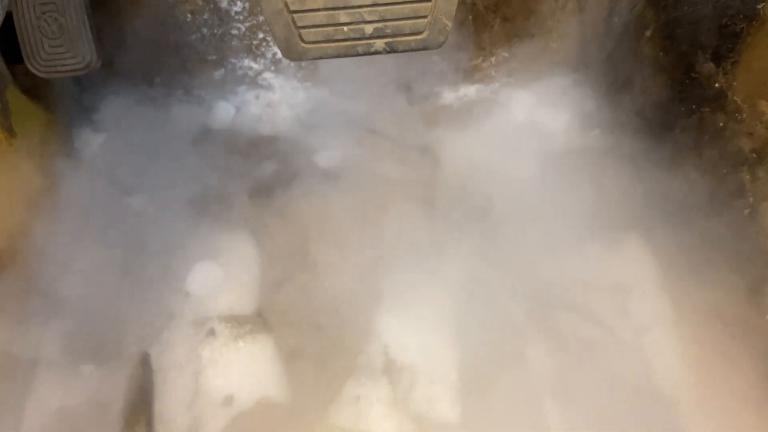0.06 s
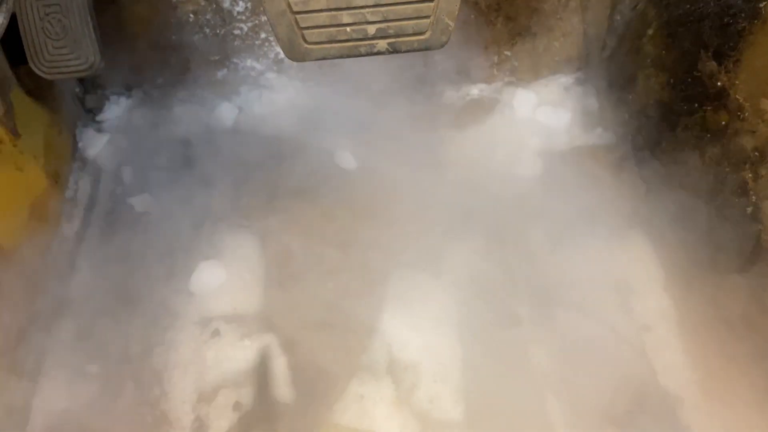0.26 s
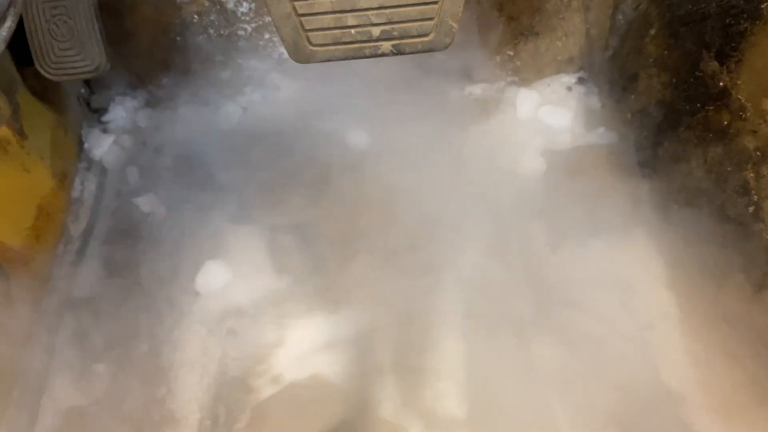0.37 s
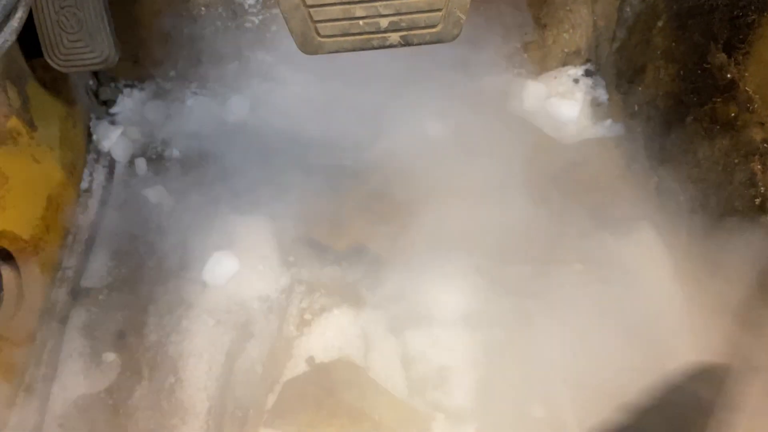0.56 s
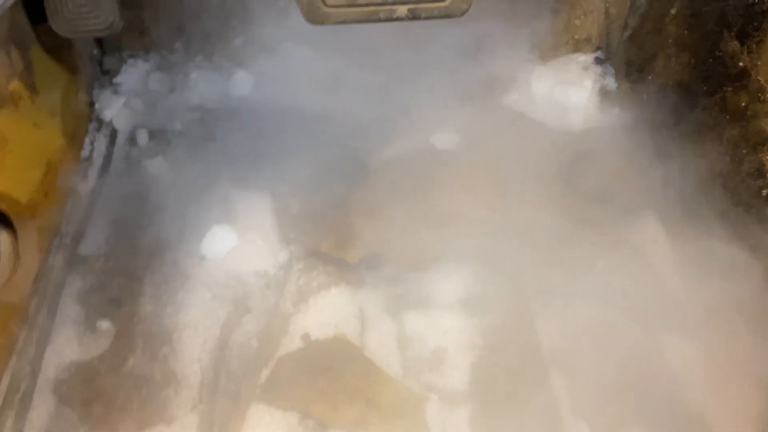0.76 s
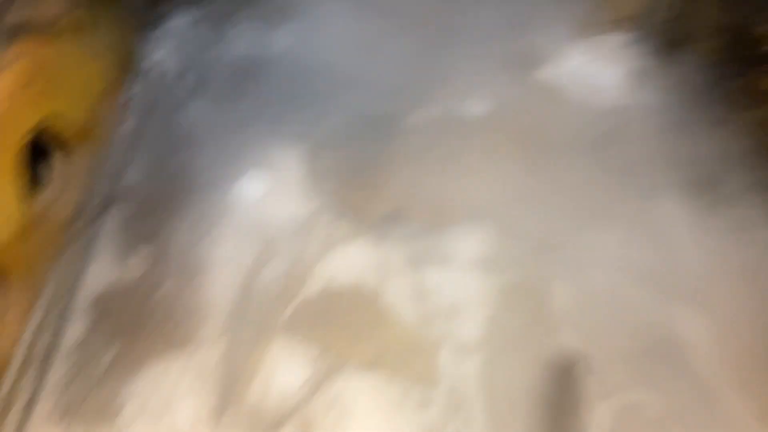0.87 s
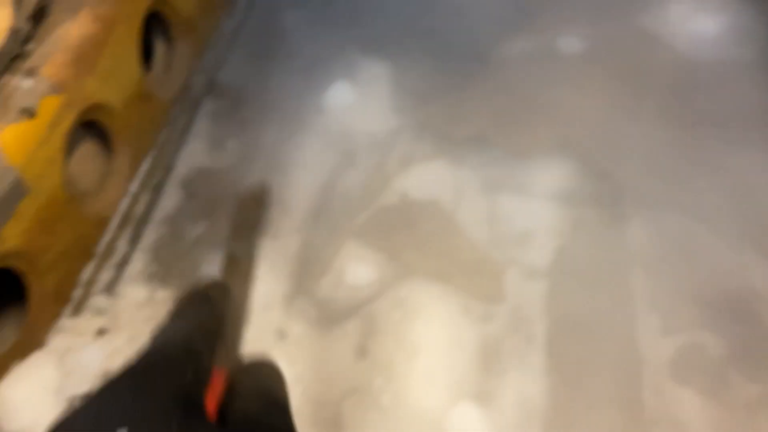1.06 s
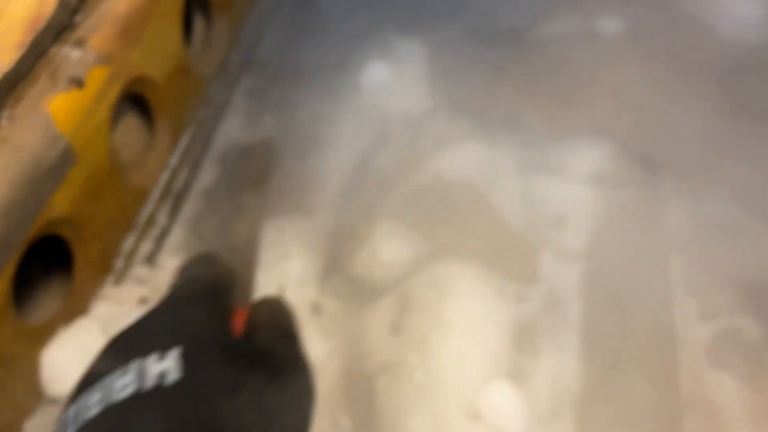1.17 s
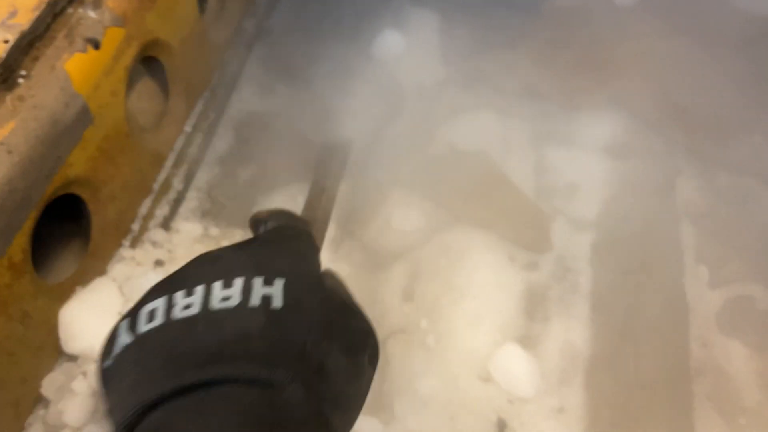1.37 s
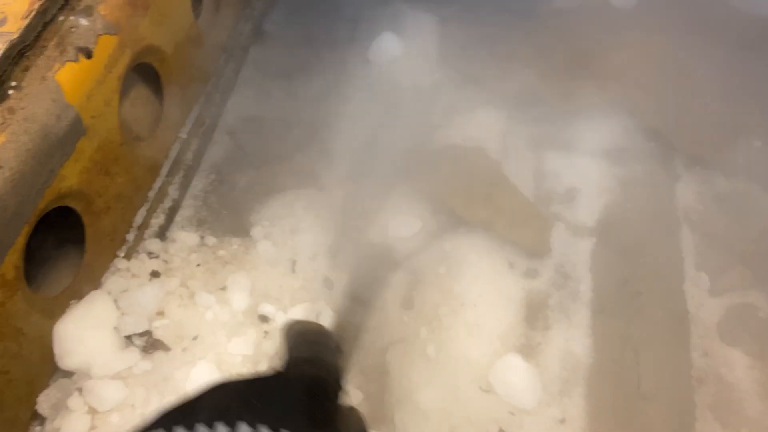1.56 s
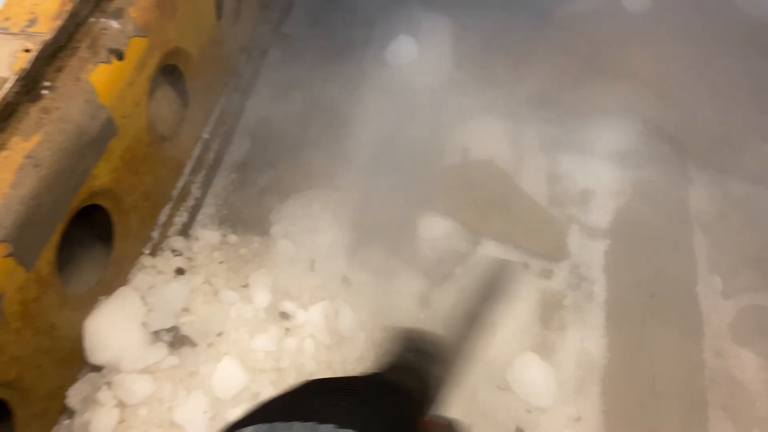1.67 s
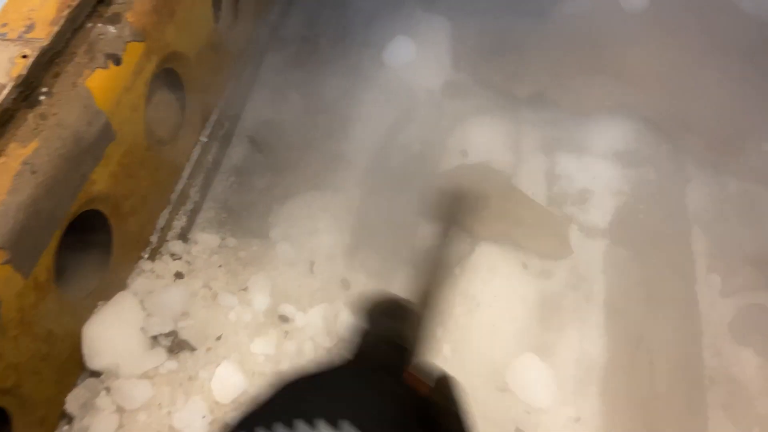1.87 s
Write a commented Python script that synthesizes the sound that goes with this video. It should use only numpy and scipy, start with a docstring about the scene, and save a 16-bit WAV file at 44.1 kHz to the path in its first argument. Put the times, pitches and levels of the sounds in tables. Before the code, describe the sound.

A cold chisel cracks and scrapes frozen, brittle material off a steel car floor, in two bursts

```python
"""Garage, close to a steel car floor: a cold chisel scrapes and cracks frozen sound deadener off it.
First a soft crack and a bouncing chip, then a volley of cracks and booms that runs into a gritty scrape.
A lull of small ticks and a faint rustle follows; a second volley breaks out and dies away.
Cracks are bursts of splinters, booms damped sines of the floor panel, the scrape clumped grit over rumble.
A camera close by hears it in widened stereo, with garage echoes and low steady air around it."""
import sys
import numpy as np
from scipy import signal
from scipy.fft import rfft, irfft, next_fast_len
from scipy.io import wavfile
from scipy.ndimage import uniform_filter1d

SR = 44100
rng = np.random.default_rng(int(sys.argv[2]) if len(sys.argv) > 2 else 0)


def nominal_scale(level):
    """Amplitude ratio for a level in decibels (scalar or array-like)."""
    x = np.asarray(level, float) / 20
    return 10 ** x


def generate_wav(signal):
    """Clip the signal to [-1, 1] and save it as 16-bit WAV at the path in sys.argv[1]."""
    frames = np.transpose(np.atleast_2d(signal))
    scaled = np.clip(frames, -1, 1) * 32767
    pcm = np.round(scaled).astype(np.int16)
    wavfile.write(sys.argv[1], SR, pcm)


N = 83790  # length in samples


def evened(x):
    """Scales a sound to an rms of one."""
    return x / np.sqrt(np.mean(x ** 2) + 1e-20)


def read(points, hz):
    """Reads a curve at the given frequencies, straight between its points on a log axis."""
    f, value = np.transpose(points)
    return np.interp(np.log(hz + 1), np.log(f + 1), value)


def add(mix, s, sound):
    """Lays a sound into the mix from second s, cut off at the end."""
    part = mix[max(round(s * SR), 0):][:len(sound)]
    part += sound[:len(part)]


def colour(x, points, tilt_db=0.):
    """Filters x by a spectrum, tilted about 3 kHz by tilt_db per octave."""
    hz = np.fft.rfftfreq(x.shape[-1], 1 / SR)
    tilt = tilt_db * np.log2((hz + 100) / 3000)
    return irfft(rfft(x) * nominal_scale(read(points, hz) + tilt), x.shape[-1])


def ring(modes, length_s):
    """The sum of dying sines that a struck thing gives."""
    t = np.arange(0, length_s, 1 / SR)
    return sum(nominal_scale(db - 60 * t / t60) * np.sin(2 * np.pi * hz * t) for hz, db, t60 in modes)


def grit(count, per_s, spread_db):
    """Sparse clicks of uneven size and sign."""
    chance, size, sign = rng.random((3, count))
    clicks = chance < per_s / SR
    return clicks * nominal_scale(-spread_db * np.log(size + .01)) * np.sign(sign - .5)


# How far left and right differ. Each row: frequency in Hz, level of the differing part in dB.
LEFT_RIGHT_DIFFERENCE = [(100, -31.5), (300, 1), (700, 5), (3000, 5), (5500, -3.2), (7500, -36.5)]


def pair(shared, other):
    """Two channels that hold one sound plus or minus a part that differs."""
    return shared + np.array([[1], [-1]]) * colour(other, LEFT_RIGHT_DIFFERENCE)


# Cracks of the frozen sheet, close by, and a faint low rustle near 1.2 s. Each row: start in seconds,
# level in dB, burst length in seconds, brightness in dB per octave, note of the burst in Hz.
CRACKS_AND_RUSTLE = [(0.01, -25, 0.0044, -4.5, 1450), (0.2128, -8.5, 0.0063, 2.5, 2580),
                     (.2140, -15.5, 0.0043, -2.5, 4500), (.2150, -9, 0.0032, 1., 3250),
                     (0.2581, -11.5, .004, -0.5, 1520), (.272, -17.5, 0.039, -2.5, 1500),
                     (.455, -10, 0.01, -10.5, 506), (0.383, -18, 0.0067, 2.5, 7200),
                     (0.3953, -5, 0.0024, -5.5, 1110), (.402, -9.5, 0.02, -8, 352),
                     (0.403, -10.5, 0.0093, -7.5, 1500), (0.451, -9, 0.0067, -3, 683),
                     (0.535, -20, 0.009, 1.4, 1280), (0.565, -23, 0.0084, -3.5, 1160),
                     (0.707, -29, 0.0047, -4, 1120), (1.193, -53, .02, -6.5, 800),
                     (1.216, -46, .015, -7, 767), (1.238, -49, .03, -7, 700),
                     (1.249, -41, 0.0054, -5.5, 815), (1.527, -19.5, 0.0055, 0, 1030),
                     (1.527, -19, 0.011, 0.5, 1886), (1.542, -12.5, 0.0018, 5, 4530),
                     (1.5441, -5.5, 0.0024, -0.4, 1927), (1.580, -23, 0.0039, 3.5, 2600),
                     (1.597, -17, .006, 1.3, 2600), (1.614, -13.5, 0.00542, 2.5, 7550),
                     (1.6252, -10.5, .002, 4.5, 2030), (1.631, -13, 0.0022, 1., 4570),
                     (1.644, -16.5, .003, 1.2, 2440)]
# Spectrum of the splinters. Each row: frequency in Hz, relative level in dB per Hz.
SPLINTER_SPECTRUM = [(180, -31), (400, -3), (900, -4.5), (2000, -1.55), (4000, -9), (6000, -12),
                     (9000, -12), (12000, -23.5), (15500, -25), (16500, -42.5)]


def cracks():
    """A first snap, a burst of splinters coloured by a note, a short fall; the rustle is made alike."""
    snap_db, fall_s = 12.5, .002
    note_db, note_octaves = 10, 0.32  # height of the note's peak, width to each side
    out, t = np.zeros(N), np.arange(4096) / SR
    for s, db, length, tilt_db, hz in CRACKS_AND_RUSTLE:
        shape = np.minimum(t / .0004, 1) * np.exp(-np.maximum(t - length, 0) / fall_s)
        note = [(hz / 2 ** note_octaves, 0), (hz, note_db), (hz * 2 ** note_octaves, 0)]
        splinters = evened(grit(4096, 12000, 3.))
        snap = nominal_scale(snap_db) * (np.arange(4096) == 24)
        burst = colour(splinters + snap, SPLINTER_SPECTRUM, tilt_db)
        # evened sets the rms, so 10.5 dB is left for the peaks
        add(out, s, nominal_scale(db - 10.5) * shape * evened(colour(burst, note)))
    return out


# The floor panel booming under a push. Each row: start in seconds, level in dB, pitch in Hz,
# length in seconds before it falls.
PANEL_BOOMS = [(0.2192, -10.5, 187, 0.0063), (.243, -25.5, 117, 0.0086), (0.2617, -11, 197, 0.0068),
               (0.277, -19.5, 121, 0.011), (0.319, -18.5, 140, 0.0084), (0.346, -23, 153, 0.013),
               (.379, -22.5, 162, 0.014), (0.399, -10, 207.8, 0.015), (0.453, -15.5, 250, 0.0053),
               (1.285, -37.5, 156, 0.018), (1.53, -26, 176, 0.018), (1.554, -18, 143, 0.0096),
               (1.572, -27, 80.5, 0.02), (1.6025, -16, 168, 0.0092), (1.627, -16, 199, 0.006),
               (1.648, -26, 156, 0.0079)]


def booms():
    """A few damped cycles of the panel, with a weak overtone."""
    rise_s, tail_s, overtone_db = .002, .005, -16
    out, t = np.zeros(N), np.arange(4096) / SR
    for s, db, hz, length in PANEL_BOOMS:
        shape = np.minimum(t / rise_s, 1) * np.exp(-np.maximum(t - length, 0) / tail_s)
        turn = 2 * np.pi * hz * t
        add(out, s, nominal_scale(db) * shape * (np.sin(turn) + nominal_scale(overtone_db) * np.sin(1.7 * turn)))
    return out


# Pressure of the blade sliding over grit. Each row: time in seconds, grit level in dB,
# panel rumble level in dB, brightness in dB per octave.
BLADE_PRESSURE = [(0, -38.5, -37, 0.3), (.05, -46.5, -40, -1.1), (.12, -55, -48.5, 0),
                  (0.196, -57.5, -53, -2.5), (.21, -44, -47.5, -5.5), (.225, -52, -36.5, -9),
                  (.25, -37, -27.5, -2), (0.271, -30, -28, 0), (.305, -24.5, -35.5, -1.5),
                  (0.336, -26, -29, 3), (0.369, -22.5, -35, 1.5), (0.391, -19, -26.5, 2),
                  (.42, -38, -27, 3), (.445, -35, -32.5, 7), (0.479, -33, -35, 0.5),
                  (.525, -37.5, -35.5, -2), (.56, -35.5, -37.5, -1.5), (0.623, -37.5, -32, 1),
                  (.70, -46, -42, 0), (.77, -62, -47, 0.9), (0.901, -81.5, -53, -12.2),
                  (1.108, -86, -60, 1.5), (1.135, -69.5, -63.5, 9), (1.17, -85, -63.5, 8),
                  (1.209, -66, -63, 1), (1.255, -70.5, -51, -1), (1.30, -86, -64, 2.5),
                  (1.399, -78.5, -69.5, 6), (1.45, -92, -71.5, 8.5), (1.527, -93.5, -68, 0),
                  (1.533, -28, -31.5, 0.2), (1.57, -42.5, -36, 3.9), (1.612, -29, -31.5, -0.7),
                  (1.638, -36.5, -24, -3.2), (1.688, -51, -39.5, 1.3), (1.802, -63, -62, .1),
                  (1.9, -71.5, -57.5, 1.5)]
# Spectrum of the grit. Each row: frequency in Hz, relative level in dB per Hz.
GRIT_SPECTRUM = [(240, -34), (450, -2.5), (1000, 1), (1500, -0.9), (2000, -2.5), (3200, -5.5), (4500, -8.5),
                 (6500, -10.5), (9000, -15), (12000, -15.5), (15600, -19.5), (16200, -58)]
# Spectrum of the panel rumble. Each row: frequency in Hz, relative level in dB per Hz.
RUMBLE_SPECTRUM = [(30, -23), (65, -4.5), (95, -2), (150, 0.65), (200, -4), (270, -5.5), (335, -2),
                   (420, -10.5), (650, -18.5), (950, -25.5), (1600, -59.5)]


def scrape():
    """Grit crushed in clumps under the blade, and the rumble of the panel beneath it."""
    clump_db, fragment_db = 1.7, 1  # loudness swing of the clumps; fragments over plain grit
    s, grit_db, rumble_db, tilt_db = np.transpose(BLADE_PRESSURE)
    clumps = evened(uniform_filter1d(uniform_filter1d(rng.standard_normal(N), 200), 200))
    dust = evened(grit(N, per_s=4000, spread_db=2.5)) + nominal_scale(fragment_db) * fragments(count=28)
    crushed = evened(colour(dust * nominal_scale(clump_db * clumps), GRIT_SPECTRUM))
    # the brightness moves with the blade
    hz, t, z = signal.stft(crushed, SR, nperseg=256)
    z = z * nominal_scale(np.interp(t, s, tilt_db) * np.log2((hz[:, None] + 100) / 3000))
    crunch = signal.istft(z, SR, nperseg=256)[1][:, :N]
    rumble = evened(colour(grit(N, per_s=900, spread_db=2.5), RUMBLE_SPECTRUM))
    t = np.arange(N) / SR
    return nominal_scale(np.interp(t, s, grit_db)) * crunch + nominal_scale(np.interp(t, s, rumble_db)) * rumble


def fragments(count):
    """Grains that ring a few cycles on their own note, each size lying a little to one side."""
    cycles = 8.
    out = np.zeros((2, N))
    for hz in np.geomspace(500, 9000, count) * rng.uniform(0.875, 1.07, count):
        turns = np.arange(round(3 * cycles * SR / hz)) * hz / SR
        note = np.sin(2 * np.pi * turns) * np.exp(-2 * turns / cycles) * hz / 1000
        sound = signal.oaconvolve(grit(N, 60, 3.0), note)[:N]
        out += sound * np.array([[1], [rng.normal(0, .6)]])  # shared part, differing part
    return evened(pair(*out))


# A loose chip bouncing to rest. Each row: start in seconds, level in dB.
CHIP_BOUNCES = [(0.029, -20), (0.092, -30), (0.126, -39.5), (0.147, -29.5)]
# Modes of the chip. Each row: frequency in Hz, relative level in dB, t60 in seconds.
CHIP_MODES = [(1150, -2, .03), (1540, 0, .028), (1350, -2, .02), (830, -7, .025), (2750, -17, .015)]
# Small splinters ticking. Each row: start in seconds, level in dB, pitch in Hz.
SPLINTER_TICKS = [(0.7581, -33, 15160), (0.8299, -46.5, 6470), (0.8654, -55.5, 2900), (0.9706, -51.5, 3230),
                  (1.0783, -54, 4070), (1.2794, -67, 2870), (1.3114, -79, 2840), (1.3414, -60.5, 7610),
                  (1.3787, -49, 6890)]


def chips():
    """Bounces ring the chip's modes; ticks are short puffs of noise around a pitch."""
    rise_s, tick_s, tick_octaves = .0006, 0.0023, 1.2
    out, t = np.zeros(N), np.arange(1024) / SR
    hz = np.fft.rfftfreq(1024, 1 / SR)
    for s, db in CHIP_BOUNCES:
        add(out, s, nominal_scale(db) * np.minimum(t / rise_s, 1) * ring(CHIP_MODES, 1024 / SR)[:1024])
    for s, db, pitch_hz in SPLINTER_TICKS:
        band = np.exp(-.5 * (np.log2((hz + 1) / pitch_hz) / tick_octaves) ** 2)
        puff = evened(irfft(rfft(rng.standard_normal(1024)) * band))
        add(out, s, nominal_scale(db - 3.5) * np.exp(-t / tick_s) * puff)
    return out


# Modes of the steel floor. Each row: frequency in Hz, relative level in dB, t60 in seconds.
STEEL_MODES = [(64, -3, .5), (90.7, -4.5, 1.5), (156, -10, 0.34), (250, -8.5, 0.32), (335, -4, 0.2),
               (410, -13, .5), (630, -17, .8), (692, -21, .5), (950, -19, 1.1), (961, -19, 1.3),
               (1142, -32, .4), (1860, -26.5, .2), (2480, -28, .3)]


def steel_ring(struck):
    """The floor's modes ring on after the sounds that strike them."""
    return nominal_scale(-31) / 20 * signal.fftconvolve(struck, ring(STEEL_MODES, N / SR))[:N]


# Echo of the garage. Each row: frequency in Hz, t60 in seconds.
GARAGE_DECAY = [(100, 0.56), (260, 0.58), (700, 0.53), (1840, 0.22), (4850, 0.41), (12000, .2)]


def garage(x):
    """Sparse taps of random sign, each band dying at its own speed."""
    taps = np.zeros((2, 30000))
    at = np.arange(60, 29980, 20) + rng.integers(0, 20, (2, 1496))
    np.put_along_axis(taps, at, rng.choice([-1., 1.], at.shape), 1)
    hz, t, z = signal.stft(pair(*taps), SR, nperseg=256)
    room = nominal_scale(-60 * t / read(GARAGE_DECAY, hz)[:, None])
    cabin = nominal_scale(13.5 - 60 * t / 0.037)  # the cabin answers first
    tail = signal.istft(z * (room + cabin), SR, nperseg=256)[1]
    return signal.fftconvolve(x[None], tail / np.linalg.norm(tail[0]), axes=1)[:, :N]


# Spectrum of the garage air. Each row: frequency in Hz, relative level in dB per Hz.
AIR_SPECTRUM = [(15, -19), (40, -3), (65, 3.9), (95, 2.5), (200, -12.5), (370, -17.5), (600, -37.5),
                (1000, -41.5), (1500, -43.5), (3000, -49.5), (7000, -47.5), (12000, -49), (15600, -59),
                (16200, -83.5)]


def hush():
    """Low steady air of the garage: coloured noise, partly different left and right."""
    return nominal_scale(-52) * evened(colour(pair(*rng.standard_normal((2, N))), AIR_SPECTRUM))


# Stereo widening, phase. Each row: frequency in Hz, radians the left channel leads the right.
WIDENING_PHASE = [(0, 0), (400, 0.73), (1200, -1.08), (2000, 4.5), (3200, 6), (6000, 8)]
# Stereo widening, level. Each row: frequency in Hz, left over right in dB.
WIDENING_BALANCE = [(60, -3), (300, -2.5), (800, -0.5), (1500, -3), (3000, 2.5), (5200, 3), (7000, 1)]


def widen_stereo(spectrum, hz):
    """Stereo widening: phase and level between left and right channels, by frequency."""
    treble_hz, treble_lag_s = 6615, 10 / SR
    lead = np.interp(hz, *np.transpose(WIDENING_PHASE + [(treble_hz, 2 * np.pi)]))
    # above treble_hz the left channel's phase falls at the slope of a fixed lag
    lead -= 2 * np.pi * np.maximum(hz - treble_hz, 0) * treble_lag_s
    # each channel takes half of the difference
    half = nominal_scale(read(WIDENING_BALANCE + [(8000, 0.0033)], hz) / 2) * np.exp(.5j * lead)
    return spectrum * np.array([half, 1 / half])


def scene():
    """The breaking and scraping close by, the ring of the floor, then garage echoes and air."""
    blows, chip, low, slide = cracks(), chips(), booms(), scrape()
    steel = steel_ring(blows + low)
    # chips and booms send less into the garage
    echoes = garage(blows + .5 * chip + steel + slide.mean(0) + nominal_scale(-8) * low)
    return blows + chip + low + steel + slide + nominal_scale(-6) * echoes + hush()


def low_pass(x):
    """Removes everything above the highest recorded frequency."""
    return signal.sosfilt(signal.butter(12, 16860, fs=SR, output="sos"), x)


def record(dry):
    """The microphone cuts deep bass, then the stereo is widened."""
    bass_cut_hz = 51.5
    size = next_fast_len(N + 4096)
    hz = np.fft.rfftfreq(size, 1 / SR)
    without_bass = rfft(dry, size) / np.sqrt(1 + (bass_cut_hz / (hz + 1)) ** 6)
    mix = irfft(widen_stereo(without_bass, hz), size)[:, :N]
    return low_pass(mix)


dry = scene()
out = record(dry)
generate_wav(out)
```